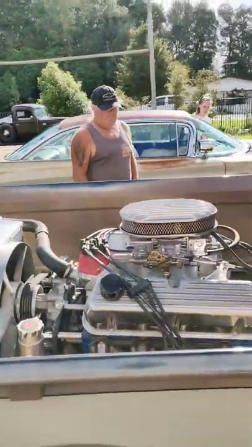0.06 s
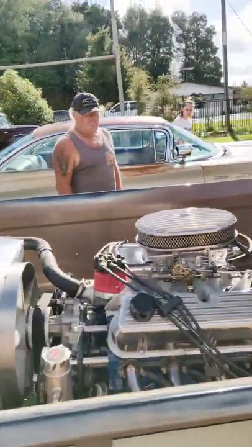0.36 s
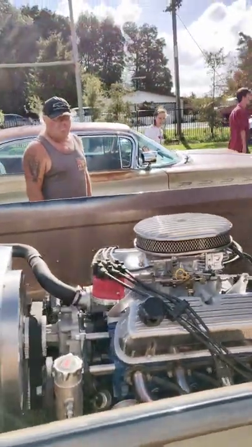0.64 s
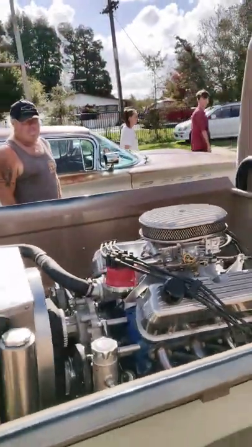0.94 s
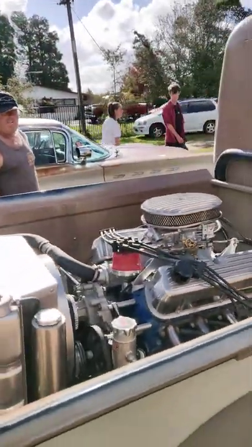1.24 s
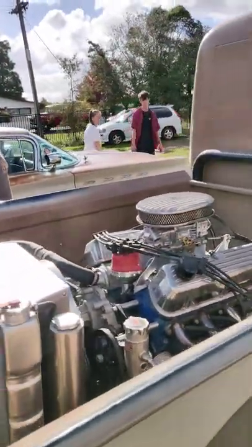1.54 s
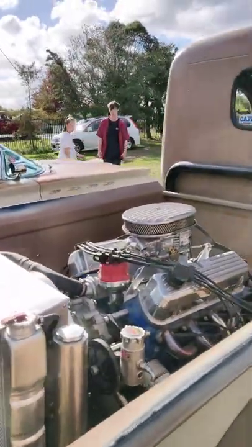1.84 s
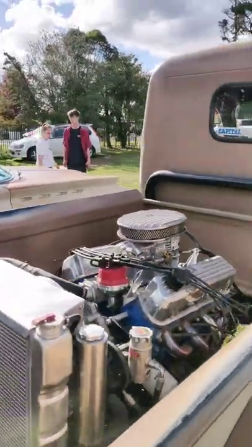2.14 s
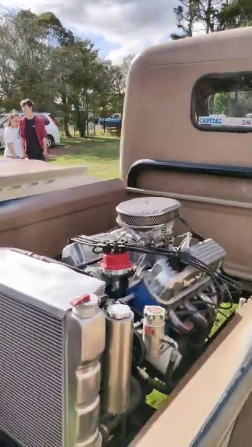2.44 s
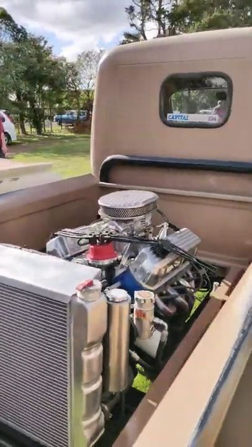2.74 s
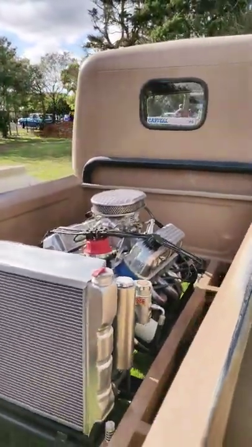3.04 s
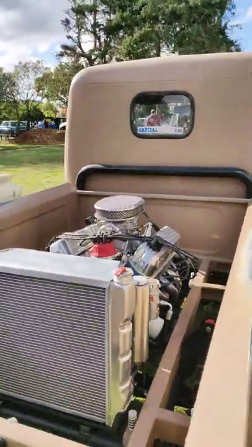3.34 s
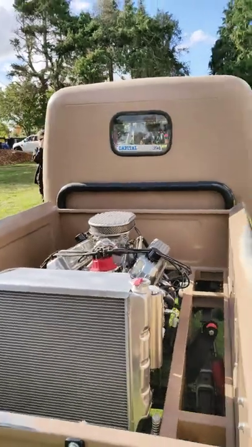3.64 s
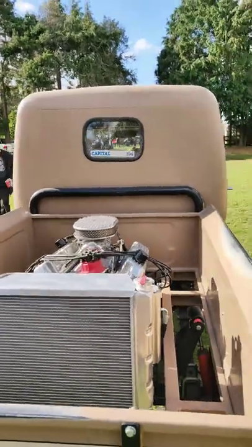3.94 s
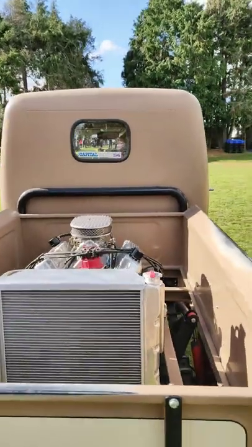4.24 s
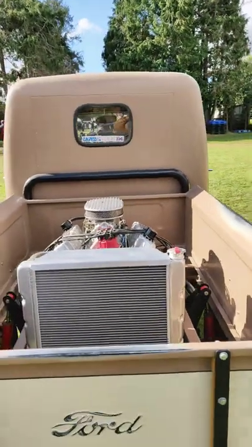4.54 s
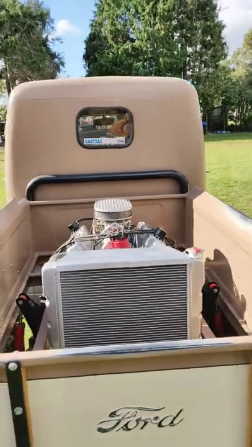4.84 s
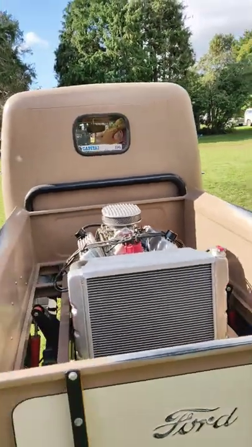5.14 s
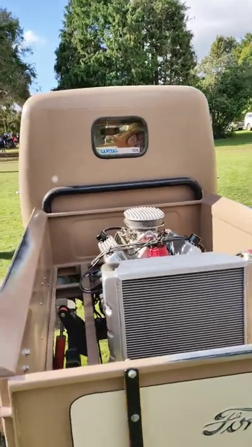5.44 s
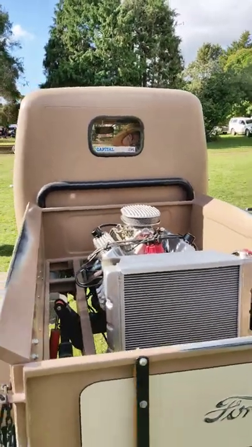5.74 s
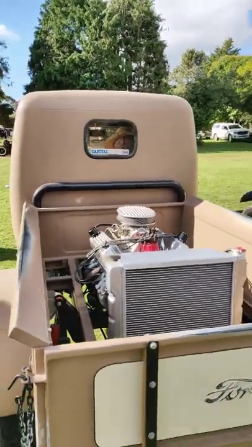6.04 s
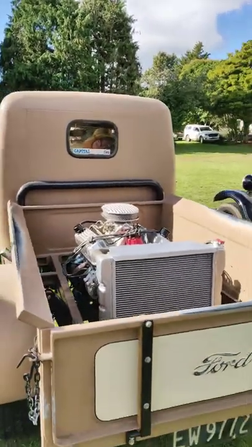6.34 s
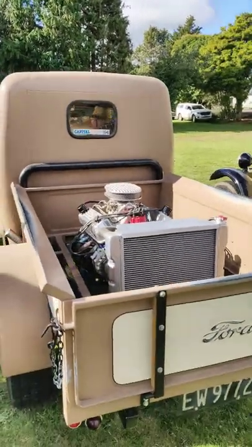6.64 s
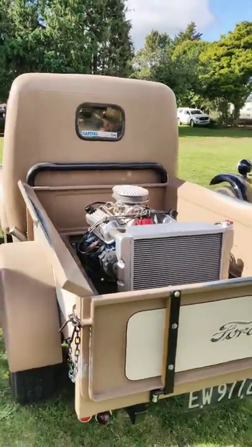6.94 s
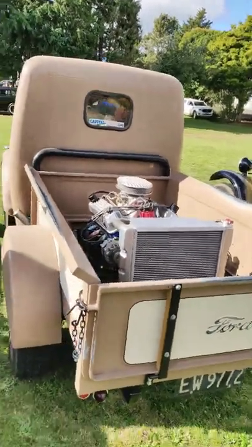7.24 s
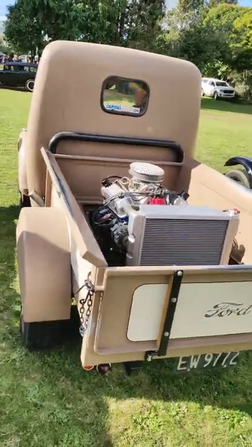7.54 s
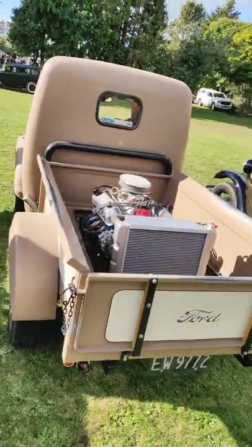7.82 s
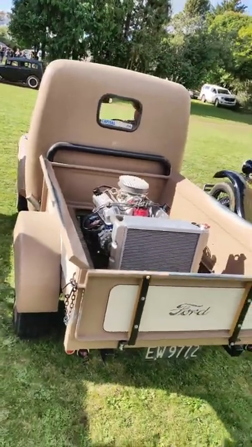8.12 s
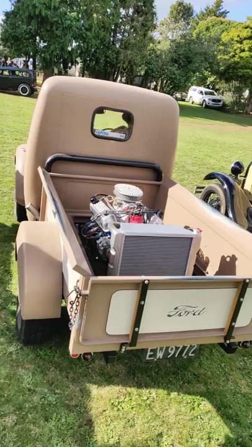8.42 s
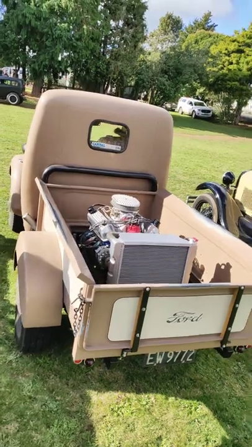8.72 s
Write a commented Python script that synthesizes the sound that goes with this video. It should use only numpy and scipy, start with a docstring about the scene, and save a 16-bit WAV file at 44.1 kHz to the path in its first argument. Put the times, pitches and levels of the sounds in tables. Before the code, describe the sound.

A loud V8 engine idles with a deep, loping burble and ticking valves, speeding up a little once before settling.

```python
"""A deep, loping burble: a cross-plane V8 with open pipes idles in a pickup's bed, speeds up once, settles.
Its firing pulses merge into a boom, while the uneven alternation of its two banks excites the pipes.
Now and then a cylinder misfires. The block knocks, the valve gear clatters and hisses in step with the
camshaft, the belt whines and squeaks, and metal pings and clinks. The balance shifts as the microphone
walks from the engine's side round to the tailgate, and puffs of wind catch its two ports."""
import sys
import numpy as np
from scipy import signal
from scipy.fft import rfft, irfft, next_fast_len
from scipy.io import wavfile
from scipy.ndimage import map_coordinates

SR = 44100
rng = np.random.default_rng(int(sys.argv[2]) if len(sys.argv) > 2 else 0)


def wav_out(sig):
    """Save sig, one row per channel (or a flat mono array), as 16-bit PCM at SR to the path in sys.argv[1]."""
    wavfile.write(sys.argv[1], SR, np.round(np.clip(np.atleast_2d(sig).T, -1, 1) * 32767).astype(np.int16))


N = 387198


def amp(db):
    """Decibels as an amplitude ratio."""
    return 10 ** (np.asarray(db) / 20)


def unit(x):
    """Normalisation to rms 1."""
    return x / np.sqrt(np.mean(x ** 2) + 1e-20)


def along(points, hz):
    """Interpolation of (Hz, value) points on a logarithmic frequency axis."""
    freqs, values = np.transpose(points)
    return np.interp(np.log(hz + 1), np.log(freqs + 1), values)


def curves(rows):
    """Linear interpolation in time: one value per sample for each column after the first."""
    times, *columns = np.transpose(rows)
    return [np.interp(np.arange(N) / SR, times, column) for column in columns]


def wobble(rate):
    """Slow random modulation: a spline through `rate` Gaussian knots a second."""
    coarse = np.arange(0, N + 32, 32)
    knots = rng.standard_normal(int(N * rate / SR) + 4)
    return np.interp(np.arange(N), coarse, map_coordinates(knots, [coarse * rate / SR], mode="nearest"))


def filtered(x, response):
    """Linear filtering: the spectrum of x is multiplied by a frequency response."""
    size = next_fast_len(N + SR // 2, real=True)
    return irfft(rfft(x, size) * response(np.fft.rfftfreq(size, 1 / SR)), size)[..., :N]


def coloured(x, spectrum):
    """Zero-phase spectral shaping by (Hz, dB) points."""
    return filtered(x, lambda hz: amp(along(spectrum, hz)))


def resonate(x, spectrum, size=32768):
    """Convolution with a minimum-phase body of this spectrum, at rms 1."""
    cepstrum = irfft(np.log(amp(along(spectrum, np.fft.rfftfreq(size, 1 / SR)))))
    cepstrum[1:size // 2] *= 2  # folding the cepstrum makes the response causal
    cepstrum[size // 2 + 1:] = 0
    impulse_response = irfft(np.exp(rfft(cepstrum)))[:size // 2]
    return unit(signal.fftconvolve(x, impulse_response)[:N])


def ringing(x, modes):
    """Modal superposition: x drives one damped resonator for each (Hz, dB, t60 s) mode."""
    out = 0
    for hz, db, t60 in modes:
        step, decay = 2 * np.pi * hz / SR, np.exp(-np.log(1000) / (t60 * SR))
        feedback = [1, -2 * decay * np.cos(step), decay ** 2]
        out = out + amp(db) * signal.lfilter([0, np.sin(step)], feedback, x)
    return out


# Likeness of the two ports. Each row: frequency in Hz, left-right correlation.
COHERENCE = [(60, 0.87), (250, 1), (700, 0.64), (1100, 0.29), (2200, 0.14), (5000, 0.13), (9000, 1)]
def rush(white, spectrum):
    """Partial coherence: two white noises mix as mid and side into coloured stereo of rms 1."""
    def response(hz):
        spread = np.arccos(np.clip(along(COHERENCE, hz), -1, 1)) / 2
        return amp(along(spectrum, hz)) * [np.cos(spread), np.sin(spread)]
    mid, side = filtered(white, response)
    return unit(np.array([mid + side, mid - side]))


# Engine speed. Each row: time in seconds, firing rate in Hz.
SPEED = [(0.0, 68.8), (0.22, 65.15), (1.4, 67.23), (1.5, 69.01), (1.68, 67.36), (2.46, 72.49),
         (2.64, 74.82), (3.08, 77.44), (3.52, 78.02), (4.18, 67.35), (4.92, 64.65), (5.36, 66.58),
         (5.94, 64.49), (6.12, 66.46), (7.04, 69.07), (7.78, 66.68), (8.78, 67.93)]
def firing_count():
    """Phase as the integral of rate, counted in firings; eight make one cycle of 720 crank degrees."""
    return np.cumsum(curves(SPEED)[0]) / SR - .95


def accents(count, table, scatter, flutter_db, depth=1, hop=8):
    """Cyclic amplitude modulation: a peak at each set crank angle, of a new height every cycle."""
    crank_deg = count[::hop] * 90
    level_db = flutter_db * wobble(380)[::hop]
    for centre, width, db in table:
        cycle, offset = np.divmod(crank_deg - centre + 1080, 720)
        offset = offset - 360
        strength = 1 + scatter * rng.uniform(-1, 1, size=128)
        shape = np.exp(-.5 * (offset / width / np.where(offset < 0, .7, 1.2)) ** 2)  # rises faster
        level_db = level_db + db * strength[cycle.astype(int)] * shape
    return unit(np.interp(np.arange(N), np.arange(0, N, hop), amp(level_db))) ** depth


def cyclic_noise(count, repeat, size=5000):
    """Partial periodicity: two noises, with the share `repeat` of their power recurring every cycle."""
    position = count / 8 % 1 * size
    patterns = rng.standard_normal((2, size))
    locked = np.array([np.interp(position, np.arange(size), row) for row in patterns])
    return np.sqrt(repeat) * unit(locked) + np.sqrt(1 - repeat) * rng.standard_normal((2, N))


# The microphone's walk. Each row: time in seconds, then weights of about 0 to 1 for being
# close to the engine, behind the tailgate and in line with the radiator.
WALK = [(0, 0.76, 0.14, 0.13), (1.0, 0.76, 0, 0.17), (1.8, 0.41, 0, 0.1), (3.7, 0.07, 0.44, 0.18),
        (4.1, 0, 0.96, 0.6), (4.501, 0.06, 0.78, 1), (6.4, 0.04, 0.81, 0.91), (7.1, 0, 0.91, 0.4),
        (7.6, 0, 1.02, 0), (8.78, 0.07, 0.89, 0)]
def level(layer_db, idle_hz=67, revved_hz=78):
    """Gains add in decibels. A level set lists: dB at idle, change at each WALK place, change revved."""
    idle_db, *place_db, revved_db = layer_db
    revved = (curves(SPEED)[0] - idle_hz) / (revved_hz - idle_hz)
    return idle_db + np.dot(place_db, curves(WALK)) + revved_db * revved


def from_the_side(pair, lead_s, louder_db):
    """Time and level differences: close to the engine, the right port hears it earlier and louder."""
    close = curves(WALK)[0]
    shift = close * lead_s * SR / 2
    ports = []
    for port, sign in zip(pair, (-1, 1)):
        shifted = map_coordinates(port, [np.arange(N) + sign * shift], order=3, mode="nearest")
        ports.append(amp(sign * close * louder_db / 2) * shifted)
    return np.array(ports)


# Wind rumble. Each row: frequency in Hz, relative density in dB.
WIND_SPECTRUM = [(10, -4.5), (30, -4), (90, 8), (200, -1), (450, -14.5), (700, -29.5), (1500, -39.5),
                 (5000, -67.5)]
# Puffs. Each row: centre in seconds, width in seconds, left level in dB, right level in dB.
PUFFS = [(1.037, 0.013, -42, -16), (5.15, 0.029, -32.5, -18.5), (5.372, 0.03, -41, -20),
         (7.565, 0.025, -15.5, -47), (7.88, 0.0042, -7, -20.5), (7.922, 0.026, -31.5, -11),
         (8.059, 0.042, -29, -19), (8.24, 0.041, -30, -23.5)]
def wind(breeze_db):
    """Turbulent pressure is local, so a breeze and its puffs rumble independently on each port."""
    t = np.arange(N) / SR
    force = amp(breeze_db + 0.78 * wobble(5.3))
    for s, width, left_db, right_db in PUFFS:
        force = force + amp([[left_db], [right_db]]) * np.exp(-.5 * ((t - s) / width) ** 2)
    return force * unit(coloured(rng.standard_normal((2, N)), WIND_SPECTRUM))


def tock(at_s, ring_hz, t60, level_db):
    """A single damped mode: a short hollow knock close to the right port."""
    out, t = np.zeros(N), np.arange(SR // 8) / SR
    envelope = amp(level_db - 60 * t / t60) * (1 - np.exp(-t * ring_hz / 2))
    out[round(at_s * SR):][:len(t)] = envelope * np.sin(2 * np.pi * ring_hz * t)
    return out * amp([[-20], [0]])


# Metallic pings. Each row: start in seconds, relative peak in dB, frequency in Hz.
PINGS = [(2.756, -35, 1540), (2.825, -33, 1530), (2.838, -35, 1660), (2.931, -32, 1605), (2.953, -33, 1530),
         (3.246, -33, 1440), (3.445, -36, 1660), (4.775, -34, 1470), (5.021, -33, 1510),
         (5.311, -30.5, 1520), (5.585, -38, 1480), (5.631, -36, 2800), (5.795, -32, 1670),
         (6.412, -34, 2550), (6.879, -32.5, 1260), (7.345, -30, 1480), (8.135, -38.5, 3130),
         (8.18, -38, 3140), (8.293, -35.5, 2450), (8.373, -34, 3150), (8.404, -36.5, 3140),
         (8.42, -33, 3125), (8.444, -37, 3190), (8.51, -32.5, 5550), (8.533, -34.5, 1520),
         (8.563, -34.5, 3140), (8.639, -40.5, 3180)]
def metal_pings(t60, gain_db):
    """Free vibration: short metallic pings and clinks from the engine and truck, as damped sinusoids."""
    out, t = np.zeros(N + SR), np.arange(SR // 8) / SR
    for s, db, hz in PINGS:
        out[round(s * SR):][:len(t)] += amp(db + gain_db - 60 * t / t60) * np.sin(2 * np.pi * hz * t)
    return out[:N]


# Echoes in the bed. Each row: delay in seconds, gain relative to the direct sound.
WALLS = [(.0013, .15), (.0022, .18), (.0031, .19), (.0043, .18), (.0058, .17), (.0081, .15)]
def truck_bed(pair, drift_s=.00011):
    """Comb filtering: echoes off steel walls add a hollow colour that drifts as the microphone moves."""
    n = np.arange(N)
    echoes = np.zeros_like(pair)
    for port, echo in zip(pair, echoes):
        for delay_s, gain in WALLS:
            echo += gain * np.interp(n - (delay_s + drift_s * wobble(0.95)) * SR, n, port)
    return (pair + echoes) / np.sqrt(1 + sum(gain ** 2 for _, gain in WALLS))


# The highest treble. Each row: frequency in Hz, relative density in dB. Then its level set.
FIZZ_SPECTRUM, FIZZ_DB = [(8000, -19.5), (10500, 2), (11500, -12.5), (12500, 3), (14000, 2.5), (14700, 0.5),
                          (16000, -11.5)], (-58, 3.5, -8.5, 14.5, 0)
def fizz():
    """Random amplitude modulation makes a faint, very high noise flicker."""
    flicker_db = 2.6 * wobble(40)
    return amp(level(FIZZ_DB) + flicker_db) * unit(coloured(rng.standard_normal(N), FIZZ_SPECTRUM))


# Belt squeaks. Each row: start in seconds, relative peak in dB, frequency in Hz.
SQUEAKS = [(4.3539, -25, 8370), (5.3292, -28.5, 8670), (6.1847, -33, 8300), (6.8672, -21.5, 8280),
           (7.3581, -34, 8030)]
def belt_squeaks(length_s, gain_db):
    """Tone bursts: the belt gives thin, high notes that swell quickly and fade."""
    out, t = np.zeros(N + SR), np.arange(int(length_s * SR)) / SR
    swell = np.sin(np.pi * np.sqrt(t / length_s))
    for s, db, hz in SQUEAKS:
        out[round(s * SR):][:len(t)] += amp(db + gain_db) * swell * np.sin(2 * np.pi * hz * t)
    return out[:N]


# Four whines. Each entry: frequency as a multiple of the firing rate.
WHINE_RATIOS = (10.72, 9.66, 12.2, 8.5)
# Each row: time in seconds, then the relative level of each whine in dB.
WHINE_LEVELS = [(0, -39, -52, -56, -56), (.45, -37, -50, -52, -56), (.7, -49, -49, -54, -56),
                (1.05, -38.5, -44, -48, -56), (1.4, -42, -46, -54, -54), (1.75, -49, -50, -56, -44),
                (1.95, -38, -50, -56, -45), (2.25, -37, -48, -56, -46), (2.45, -43, -47, -56, -47),
                (2.7, -42, -44, -56, -48), (3.1, -52, -42, -58, -50), (3.7, -46, -48, -58, -50),
                (4.4, -41.5, -49, -52, -52), (4.8, -52, -47, -52, -52), (5.9, -45, -50, -46, -54),
                (6.4, -54, -46, -54, -56), (7.2, -58, -51, -60, -56), (7.7, -58, -47, -55, -50),
                (8.78, -57, -48.5, -52, -54)]
def belt_whine(waver_rad=.75, waver_db=3):
    """Rotational orders: the belt drive's tones follow engine speed, wavering in phase and level."""
    phase = 2 * np.pi * np.cumsum(curves(SPEED)[0]) / SR
    tones = sum(amp(db + waver_db * wobble(24)) * np.sin(ratio * phase + waver_rad * wobble(30))
                for ratio, db in zip(WHINE_RATIOS, curves(WHINE_LEVELS)))
    return np.sqrt(2) * tones


# The hiss at each port. Each row: frequency in Hz, relative density in dB.
HISS_LEFT, HISS_RIGHT = [(2500, -56), (4000, -5.5), (4900, -3.5), (5400, 0.5), (6200, 6), (6900, -2),
                         (7500, -3), (8400, -17), (9300, -45), (10500, -51), (16000, -71)], [(2500, -37.5), (4200, -24), (5800, -4.5), (6500, -3),
                                            (7300, -1.5), (8500, -2.5), (9300, -11.5), (10200, -28),
                                            (11500, -43), (16000, -43.5)]
# Its surges. Each row: crank angle in degrees, width in degrees, accent in dB. Then its level set.
SURGES, HISS_DB = [(80.5, 69, 4.2), (256, 60, 2.9), (494, 60, 2.7)], (-41, 3.5, 0.64, 0, -2)
def valve_hiss(count, correlation=.35):
    """Modulated noise: the valve gear's hiss surges with the camshaft, coloured differently per port."""
    left, other = cyclic_noise(count, repeat=0.053)
    right = correlation * left + np.sqrt(1 - correlation ** 2) * other
    ports = unit(np.array([coloured(left, HISS_LEFT), coloured(right, HISS_RIGHT)]))
    surges = accents(count, SURGES, scatter=.5, flutter_db=2)
    return amp(level(HISS_DB) + 2 + 1.4 * wobble(12)) * surges * ports


# The chirp's band. Each row: frequency in Hz, relative density in dB.
CHIRP_SPECTRUM = [(5500, -47.5), (7400, -4), (8200, 8), (8700, 8), (9300, 3), (10200, -20), (16000, -47)]
# Its timing. Each row: crank angle in degrees, width in degrees, accent in dB.
CHIRPS = [(95, 19, 2.1), (245, 43, 8.8)]
def chirp(count):
    """Narrow-band noise with one strong swell a cycle is heard as a recurring chirp."""
    swells = accents(count, CHIRPS, scatter=0.47, flutter_db=2.5)
    return amp(level(HISS_DB) - 4) * swells * rush(cyclic_noise(count, repeat=0.78), CHIRP_SPECTRUM)


# Rocker cover modes. Each row: frequency in Hz, relative level in dB, 60 dB decay time in seconds.
COVER_MODES = [(1400, -8, .022), (1660, -3, .022), (1950, -10, .018), (2280, -2, .028), (2420, -1.5, .028),
               (2570, -5, .025), (2850, -4, .025), (3060, -3, .024), (4620, -5, .022), (5320, -4, .022)]
def valve_ticks(count, force, scatter_db, rise_s=.0008):
    """Impact excitation: sixteen valves shut each cycle, each ringing a new mix of the covers' modes."""
    valve = np.arange(2 * int(count[-1]))
    closing = valve / 2 + 0.0811 * rng.standard_normal(len(valve))  # in firings
    onsets = np.interp(closing, count, np.arange(N)).astype(int)
    t = np.arange(SR // 50) / SR
    hz, db, t60 = np.transpose(COVER_MODES)
    envelopes = amp(db[:, None] - 60 * t / t60[:, None]) * (1 - np.exp(-t / rise_s))
    modes = envelopes * np.sin(2 * np.pi * hz[:, None] * t)
    blow = np.sqrt(force[onsets]) * amp(scatter_db * rng.uniform(-1, 1, len(valve)))
    per_port = rng.uniform(-1, 1, (2, len(valve), len(hz)))
    shared = rng.uniform(-1, 1, (len(valve), len(hz)))
    rings = blow[:, None] * ((per_port + shared) @ modes)
    samples = (onsets[:, None] + np.arange(len(t))).ravel()
    return unit(np.array([np.bincount(samples, port.ravel(), N)[:N] for port in rings]))


# Valve gear rattle. Each row: frequency in Hz, relative density in dB.
CLATTER_SPECTRUM = [(400, -33), (900, -3.5), (1250, 3.5), (1540, 2.5), (1900, 3), (2150, 2.5), (2380, -2),
                    (2750, 1), (3100, -1.5), (3650, 0), (5000, -3), (7500, -20), (10000, -49),
                    (16000, -62.5)]
# Its clacks. Each row: crank angle in degrees, width in degrees, accent in dB. Then its level set.
CLACKS, CLATTER_DB = [(108, 95, 3.9), (256, 450, 2.7), (590, 35, 3.8)], (-44, 4.5, -1, 1.2, -2)
def valve_clatter(count):
    """Common modulation: one camshaft rhythm drives both a noisy rattle and the separate ticks."""
    clatter_db = level(CLATTER_DB)
    force = accents(count, CLACKS, scatter=0.4, flutter_db=2)
    rattle = force * amp(clatter_db + 1.6) * rush(cyclic_noise(count, repeat=0.18), CLATTER_SPECTRUM)
    return rattle + amp(clatter_db - 6) * valve_ticks(count, force, scatter_db=10)


# A hollow tone near 1.5 kHz. Each row: time in seconds, frequency in Hz, level in dB.
HOLLOW_TONE = [(0, 1545, -48), (.35, 1530, -41), (.65, 1515, -40.5), (.8, 1455, -39), (1.4, 1415, -43),
               (1.7, 1395, -53), (2.1, 1375, -50), (2.5, 1520, -57), (2.9, 1570, -54), (3.6, 1560, -56),
               (4.2, 1540, -57), (4.8, 1500, -49), (5.4, 1510, -53), (8.78, 1520, -54)]
def hollow_tone(blows, t60=.055):
    """Narrow-band noise: a hollow tone pulses with the taps and shifts as the microphone moves."""
    hz, tone_db = curves(HOLLOW_TONE)
    phase = 2 * np.pi * np.cumsum(hz) / SR
    decay = np.exp(-np.log(1000) / (t60 * SR))
    in_phase, quadrature = signal.lfilter([1], [1, -decay], blows * rng.standard_normal((2, N)))
    return amp(tone_db) * unit(in_phase * np.cos(phase) + quadrature * np.sin(phase))


# A lifter's tap. Each row: frequency in Hz, relative density in dB.
TAP_SPECTRUM = [(700, -26.5), (1200, -19.5), (1500, 11), (1900, -21), (2380, -9.5), (2700, -10),
                (3080, -4.5), (3700, -24), (4700, -1.5), (6500, 2.5), (8000, -13), (10500, -51.5)]
# The taps. Each row: crank angle in degrees, width in degrees, accent in dB. Then their level set.
TAPS, LIFTER_DB = [(84, 26, 22), (262, 22, 17), (365, 24, 12), (535, 22, 19), (712, 14, 13)], (-53.5, 23.5, 6.5, -10.5, -2.5)
def lifters(count, ring_share=.45):
    """Impact and after-ring: each loose lifter taps once a cycle, and the covers' modes carry it on."""
    blows = accents(count, TAPS, scatter=0.12, flutter_db=1.8)
    tap = blows * rush(cyclic_noise(count, repeat=0.2), TAP_SPECTRUM)
    ring = unit(ringing(blows * cyclic_noise(count, repeat=0.11), COVER_MODES))
    tapping = np.sqrt(1 - ring_share) * tap + np.sqrt(ring_share) * ring
    return amp(level(LIFTER_DB)) * tapping + hollow_tone(blows ** 0.4)


# The block's lower and higher ring. Each row: frequency in Hz, relative density in dB.
BLOCK_LOW, BLOCK_HIGH = [(300, -34), (520, -3.5), (620, 5.5), (700, 5), (800, -10), (950, -17.5),
                         (1300, -12), (3000, -63.5)], [(400, -54), (640, -17.5), (730, 5.5), (830, 0.5), (920, -15),
                                        (1050, -26), (1400, -39.5), (3000, -70.5)]
# Their level sets.
BLOCK_LOW_DB, BLOCK_HIGH_DB = (-41.5, 3, -2.5, 3, 3.5), (-46, 10, -2.5, 1.5, 5.5)
# Knocks. Each row: crank angle in degrees, width in degrees, relative accent in dB.
KNOCKS = [(68, 13, 8.5), (158, 16, 4.5), (243, 14, 6), (328, 16, 7), (413, 14, 9.5), (515, 18, 4),
          (600, 12, 4.5), (685, 12, 4.5)]
def block(count, smoothing=.5):
    """Crank-locked knocks modulate the block's ring and the whines, less deeply behind the tailgate."""
    behind = curves(WALK)[1]
    blows = accents(count, KNOCKS, scatter=.22, flutter_db=1.1, depth=1 - smoothing * behind)
    low = amp(level(BLOCK_LOW_DB)) * rush(cyclic_noise(count, repeat=0.36), BLOCK_LOW)
    high = amp(level(BLOCK_HIGH_DB)) * rush(cyclic_noise(count, repeat=0.25), BLOCK_HIGH)
    return blows * (low + high) + blows ** .85 * belt_whine() * amp([[-1], [0]])


# Block modes. Each row: frequency in Hz, relative level in dB, 60 dB decay time in seconds.
BLOCK_MODES = [(660, -5.5, 0.02), (720, -1.5, 0.025), (825, -13, 0.013), (1570, -8, .015)]
# The hardest blows. Each row: start in seconds, relative strength in dB.
HARD_KNOCKS = [(0.6, -27), (0.673, -22.5), (1.022, -32), (1.289, -16.5), (1.408, -22), (1.877, -21),
               (1.993, -32), (2.108, -19.5), (2.168, -20), (2.445, -28.5), (2.541, -33.5), (2.611, -23),
               (2.648, -19.5), (2.718, -25.5), (2.822, -28), (2.978, -24.5), (3.033, -21), (3.185, -32),
               (3.275, -25), (3.341, -20), (3.39, -28.5), (3.481, -22.5), (3.908, -23), (4.097, -22)]
def hard_knocks(gain_db, crack_db):
    """Impulse response: single hard blows ring the block's modes, each with a brief crack of noise."""
    blows, t = np.zeros(N), np.arange(SR // 100) / SR
    for s, db in HARD_KNOCKS:
        blows[round(s * SR)] = amp(db + gain_db)
    envelope = np.convolve(blows, amp(-60 * t / t[-1]))[:N]
    crack = envelope * rush(rng.standard_normal((2, N)), CLATTER_SPECTRUM)
    return ringing(blows, BLOCK_MODES) + amp(crack_db) * crack


# Low humming tones. Each entry: harmonic number of the engine cycle.
DRONE_ORDERS = (14, 15, 16, 19, 22, 24, 27, 42)
# Each row: a tone's level at idle in dB, then its change in dB close to the engine,
# behind the tailgate, in line with the radiator and when revved.
DRONE_LEVELS = [(-41.5, 9, 6.5, 4.5, -10.5), (-44, 4, 3.5, -6.5, 4.5), (-48.5, -13.5, 9, 3, 12),
                (-38.5, 16.5, 18, 0.5, -3), (-48, -6, 0, -3, 5), (-39.5, 3.5, 3, -2, -14),
                (-37, 0, -11, 9, -12), (-55.5, 8.5, 4, 5, -9)]
def drone(count):
    """Harmonic series: low humming tones on fixed harmonics of the engine cycle follow its speed."""
    phase = 2 * np.pi * count / 8
    tones = sum(amp(level(layer_db)) * np.sin(order * phase)
                for order, layer_db in zip(DRONE_ORDERS, DRONE_LEVELS))
    return amp(0.96 * wobble(15)) * np.sqrt(2) * tones


# Rushing gas. Each row: frequency in Hz, relative density in dB. Then its level set.
RASP_SPECTRUM, RASP_DB = [(50, -27), (110, -2.5), (160, 2.5), (215, 8), (280, 3.5), (320, 0), (360, -2.5),
                          (470, -6.5), (700, -10.5), (1200, -13.5), (3000, -71.5)], (-31.5, 1, -1, -2.5, -4)
# Its gusts. Each row: crank angle in degrees, width in degrees, relative accent in dB.
LOPE = [(105, 28, 4), (335, 55, 10), (535, 20, 6), (605, 28, 5)]
def exhaust_rasp(count, smoothing=.65):
    """Turbulent flow noise: gas leaves the pipes in a loping rhythm, smoother behind the tailgate."""
    behind = curves(WALK)[1]
    lope = accents(count, LOPE, scatter=.2, flutter_db=1, depth=1 - smoothing * behind)
    flutter = amp(1.5 * wobble(45))
    gas = rush(cyclic_noise(count, repeat=0.5), RASP_SPECTRUM)
    return amp(level(RASP_DB)) * unit(lope * flutter * gas)


# The cylinders in firing order. Each entry: pulse strength; factor on the scatter; bank as +1 or -1.
STRENGTH, UNSTEADINESS, BANK = [1.13, 1.16, 1.1, 1.24, 1.2, 1.26, 1.4, 1.14], [2, 0.34, 0.63, 1.3, 2.33, 1.1, .5, 2.1], [1, -1, -1, 1, -1, 1, 1, -1]
# Uneven burning, least at speed. Each row: time in seconds, relative scatter of the firing strength.
BURN_SCATTER = [(0, .065), (1.7, .06), (2.8, .035), (3.8, .045), (4.4, .115), (8.78, .11)]
# Misfires. Each row: time in seconds, strength left to the nearest firing.
MISFIRES = [(.193, 0), (.56, .05), (.801, 0.7), (1.163, 0), (3.386, 0.1), (4.028, 0.9), (4.382, 0),
            (4.624, 0.3), (4.746, .05), (4.993, 0.17), (5.237, 0.2), (5.478, 0.2), (5.661, 0.15),
            (5.844, 0.04), (5.968, 0.4), (6.21, 0), (6.568, 0.3), (6.802, 0.5), (7.504, 0.26), (7.623, 0),
            (7.862, 0.4), (8.22, 0.3)]
# Responses to the banks' sum and difference. Each row: frequency in Hz, relative gain in dB.
BOOM_SPECTRUM, BURBLE_SPECTRUM = [(4, -75.5), (12, -30.5), (25, 8), (42, -3), (70, 5), (92, 6.5),
                                  (132, -21.5), (157, -13), (178, -20), (200, -29.5), (300, -49.5),
                                  (600, -49), (1500, -110)], [(12, -36.5), (25, -32), (42, 8), (60, 0.5), (76, 0.5),
                                                (92, -3.5), (110, 7.5), (135, 3), (160, -2), (180, -10),
                                                (205, -19.5), (230, -14.5), (265, -26.5), (400, -31.5),
                                                (1500, -84.5)]
# Their level sets.
BOOM_DB, BURBLE_DB = (-10, 1.2, -1.78, .5, -1), (-21.5, -2.2, 0.9, 3, 1)
def exhaust_pulses(count, jitter_s_per_scatter, weak_cylinder=4, part_burn_chance=.1, part_burn=.94):
    """Source and filter: the summed firing pulses boom; the banks' uneven turns burble in the pipes."""
    firing = np.arange(-1, int(count[-1]))
    times = np.interp(firing, count, np.arange(N) / SR)
    scatter = np.interp(times, *np.transpose(BURN_SCATTER)) * np.take(UNSTEADINESS, firing, mode="wrap")
    burn_error, timing_error, bank_error = scatter * rng.standard_normal((len(firing), 3)).T
    strength = np.take(STRENGTH, firing, mode="wrap") * (1 + burn_error)
    weak = firing % len(STRENGTH) == weak_cylinder
    strength[weak & (rng.random(len(firing)) < part_burn_chance)] = part_burn
    for s, remaining in MISFIRES:
        strength[np.argmin(abs(times - s))] = remaining
    times = times + jitter_s_per_scatter * timing_error  # an uneven burn also comes early or late
    onsets = np.clip(np.round(times * SR).astype(int), 0, N - 1)
    banks = np.take(BANK, firing, mode="wrap") * strength * (1 + 1.3 * bank_error)
    boom = resonate(np.bincount(onsets, -strength, N), BOOM_SPECTRUM)
    burble = resonate(np.bincount(onsets, banks, N), BURBLE_SPECTRUM)
    return amp(level(BOOM_DB)) * boom + amp(level(BURBLE_DB)) * burble


def scene():
    """Superposition: exhaust, block and valve gear share one crank phase; pings and wind add to them."""
    count = firing_count()
    rumble = exhaust_pulses(count, jitter_s_per_scatter=0.004) + exhaust_rasp(count) + drone(count)
    knocks = block(count) + hard_knocks(gain_db=-5.5, crack_db=-13.5)
    valves = valve_clatter(count) + valve_hiss(count)
    treble = chirp(count) + fizz() + belt_squeaks(length_s=0.032, gain_db=-6.5)
    machinery = valves + treble * amp([[-18], [0]]) + lifters(count)  # treble mostly on the right
    engine = rumble * amp([[-.12], [.12]]) + knocks + truck_bed(machinery)
    return (from_the_side(engine, lead_s=.00036, louder_db=1.4)
            + metal_pings(t60=0.057, gain_db=-0.5)
            + wind(breeze_db=-33.5)
            + tock(at_s=5.361, ring_hz=480, t60=0.053, level_db=-8.5))


def record(dry):
    """Soft saturation rounds off the highest peaks, and a low-pass filter limits the band."""
    ceiling, top_hz = .7, 15800
    rounded = dry / (1 + (dry / ceiling) ** 8) ** (1 / 8)
    return filtered(rounded, lambda hz: hz < top_hz)


dry = scene()
out = record(dry)
wav_out(out)
```